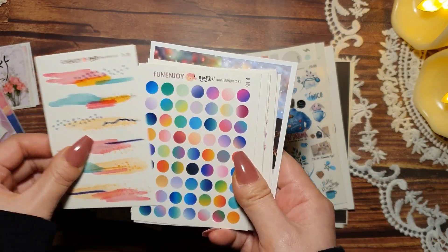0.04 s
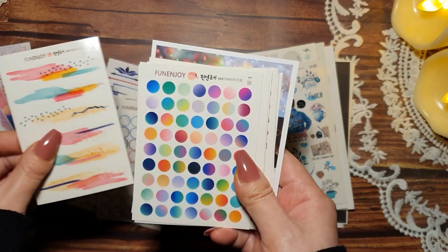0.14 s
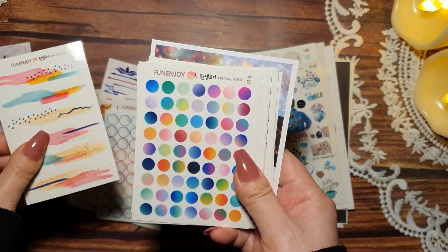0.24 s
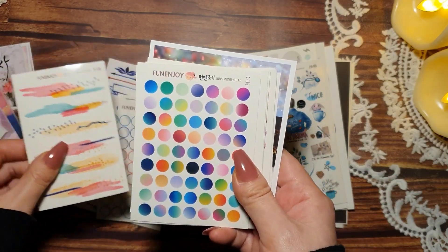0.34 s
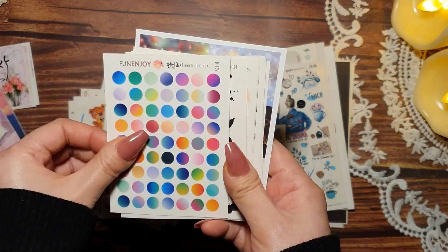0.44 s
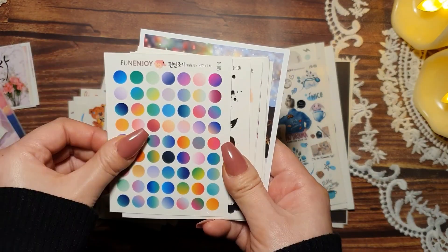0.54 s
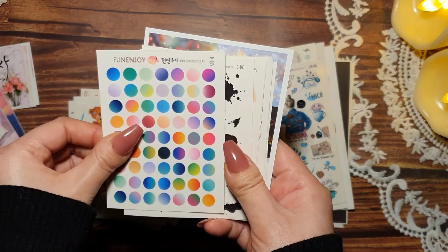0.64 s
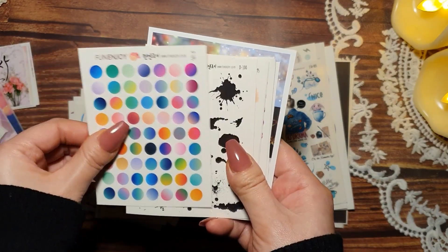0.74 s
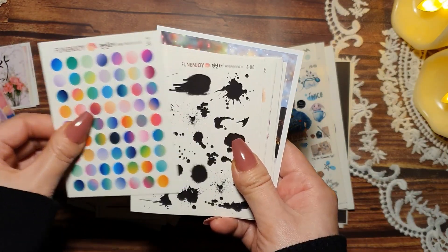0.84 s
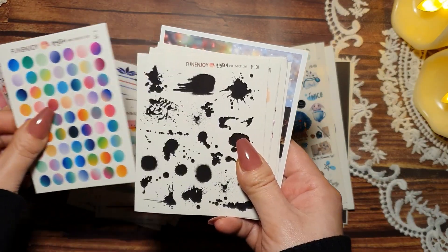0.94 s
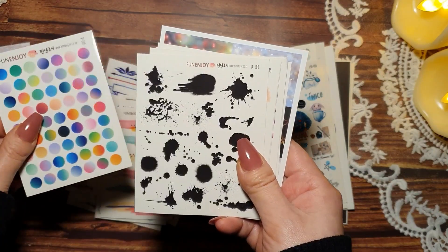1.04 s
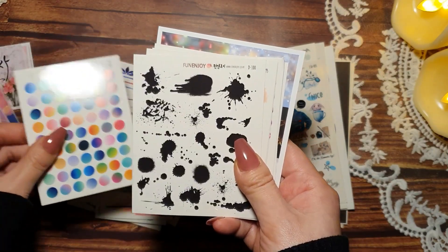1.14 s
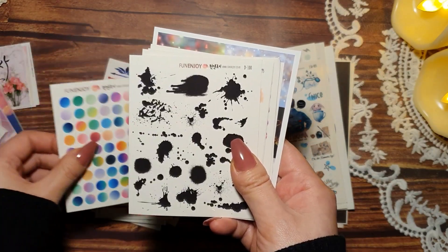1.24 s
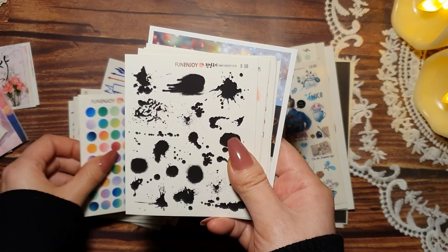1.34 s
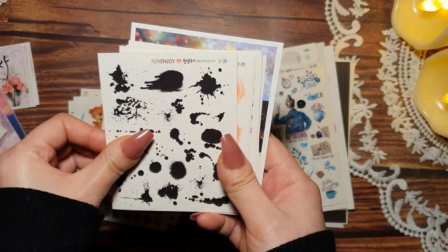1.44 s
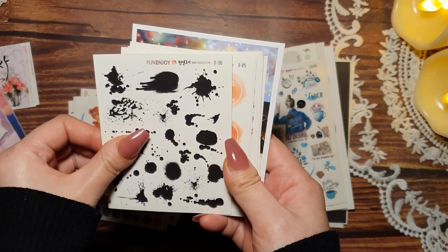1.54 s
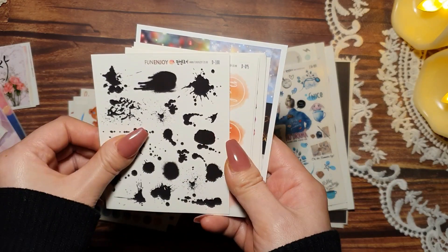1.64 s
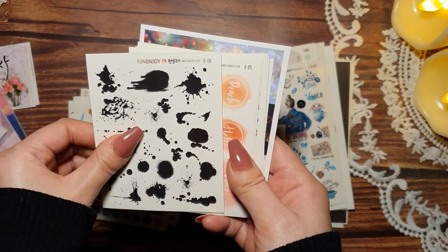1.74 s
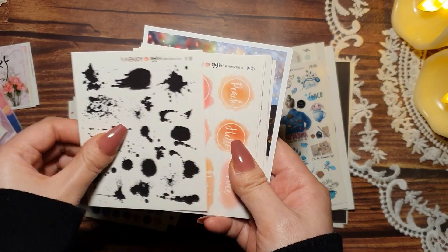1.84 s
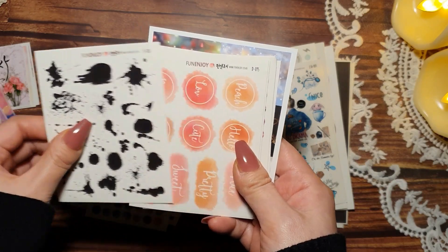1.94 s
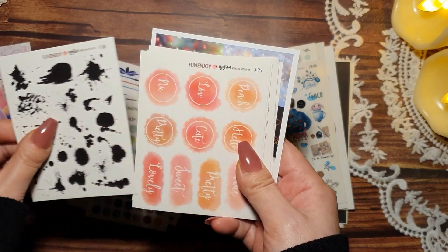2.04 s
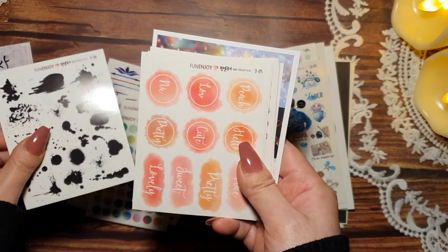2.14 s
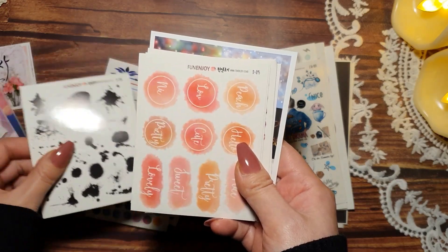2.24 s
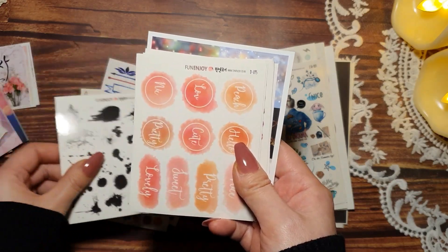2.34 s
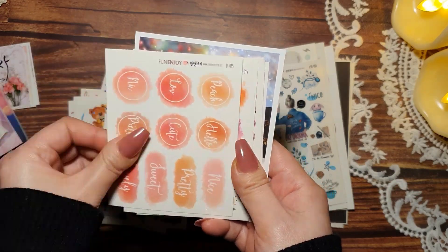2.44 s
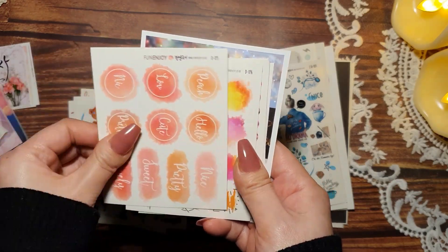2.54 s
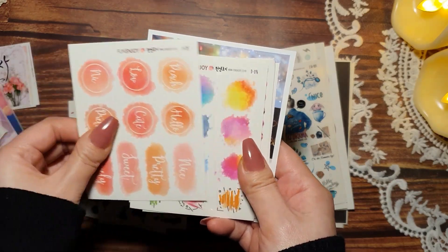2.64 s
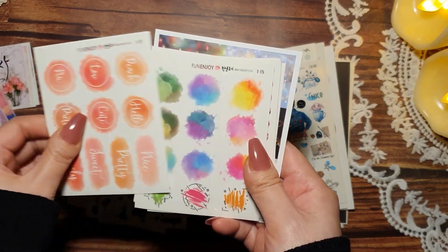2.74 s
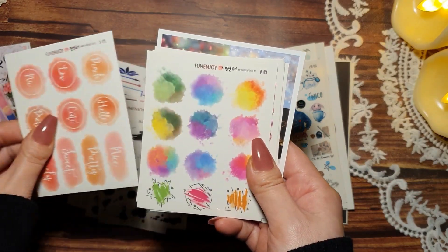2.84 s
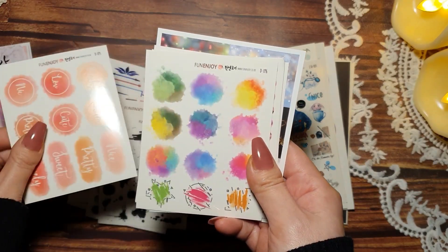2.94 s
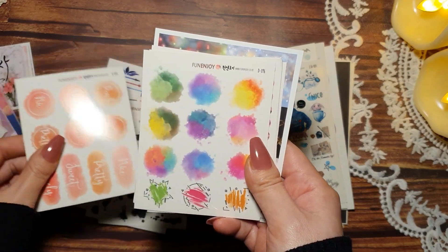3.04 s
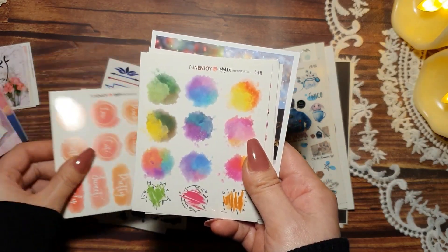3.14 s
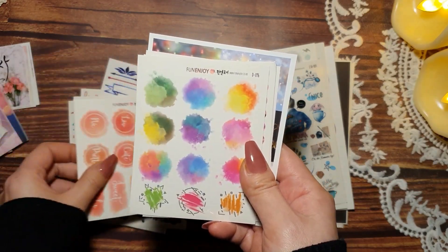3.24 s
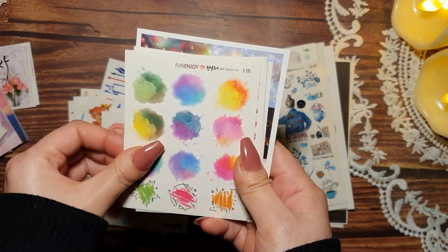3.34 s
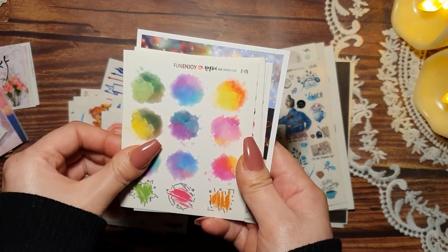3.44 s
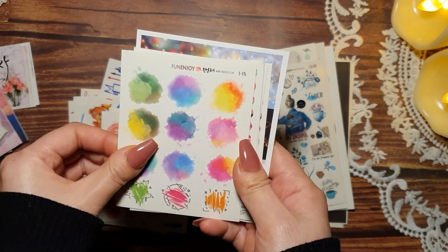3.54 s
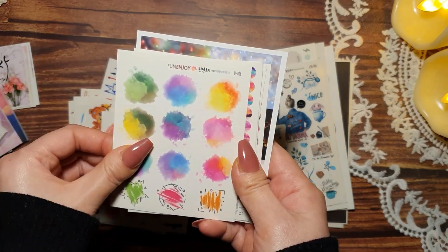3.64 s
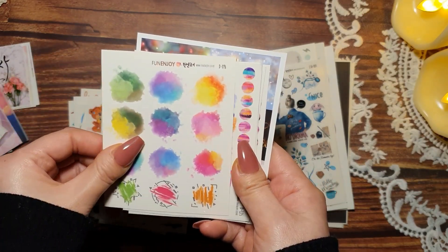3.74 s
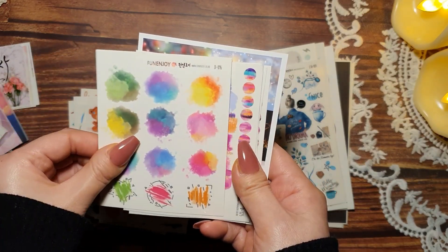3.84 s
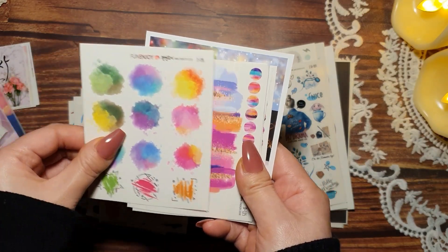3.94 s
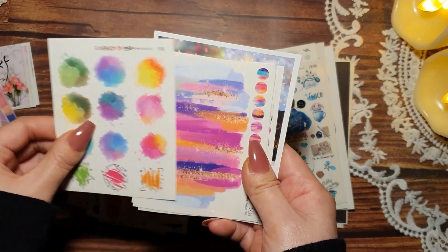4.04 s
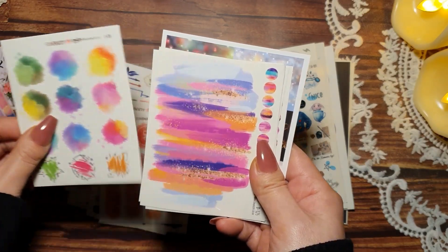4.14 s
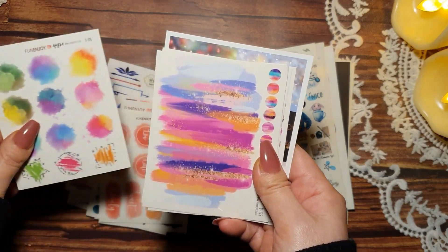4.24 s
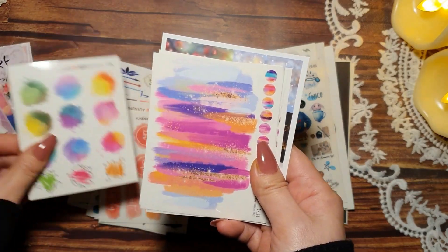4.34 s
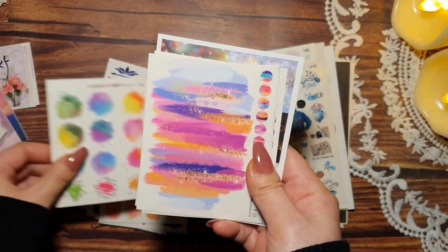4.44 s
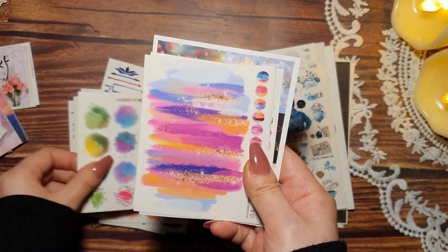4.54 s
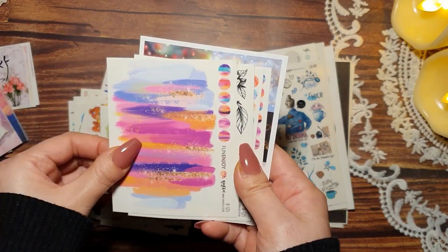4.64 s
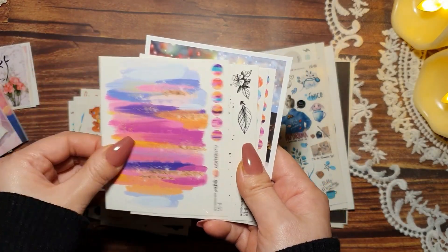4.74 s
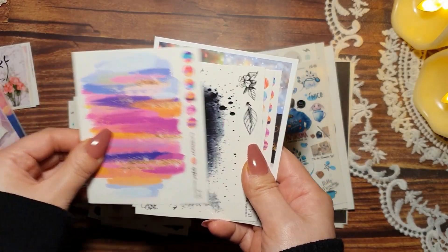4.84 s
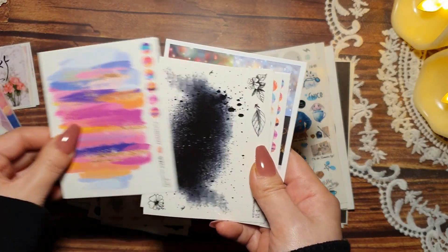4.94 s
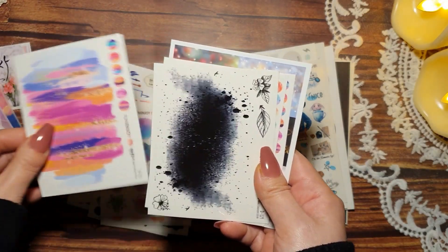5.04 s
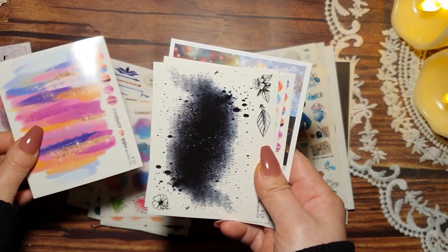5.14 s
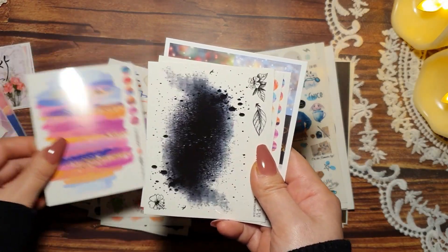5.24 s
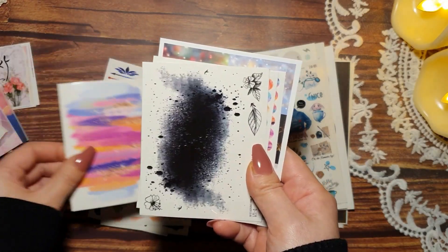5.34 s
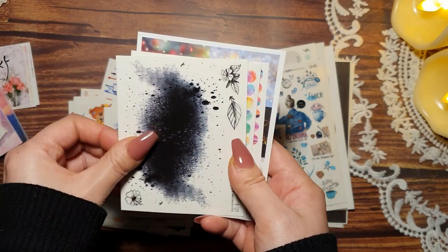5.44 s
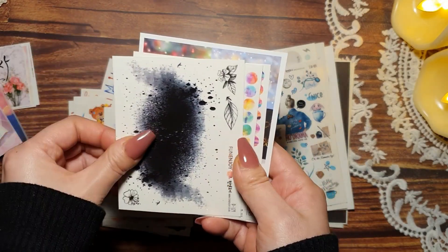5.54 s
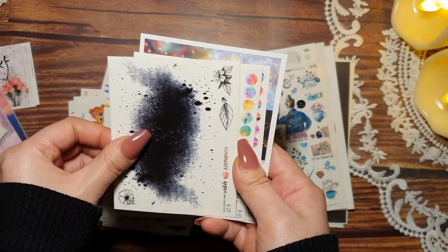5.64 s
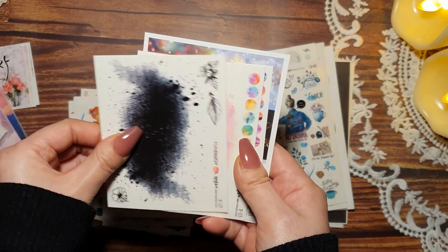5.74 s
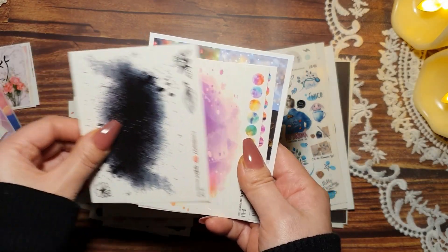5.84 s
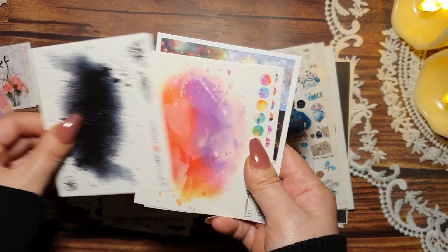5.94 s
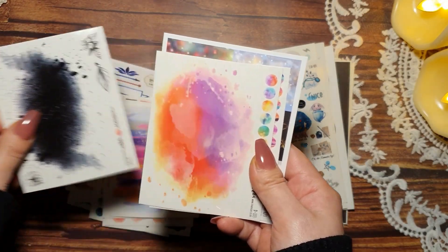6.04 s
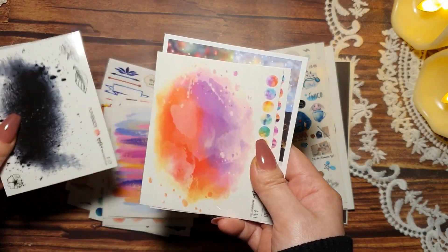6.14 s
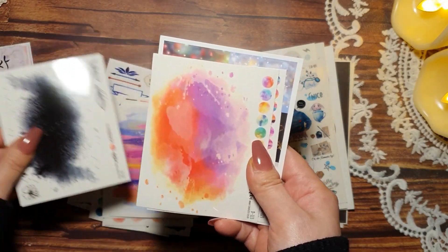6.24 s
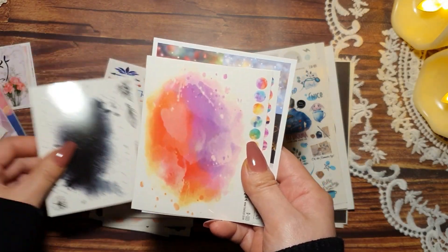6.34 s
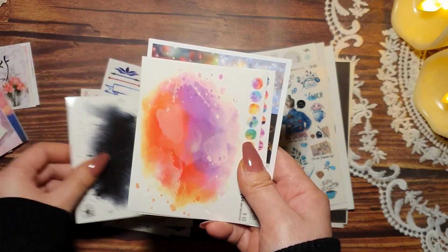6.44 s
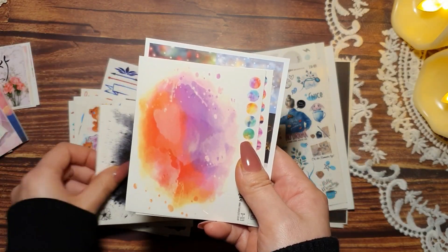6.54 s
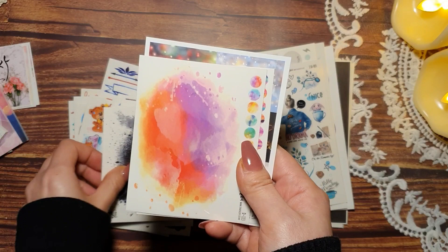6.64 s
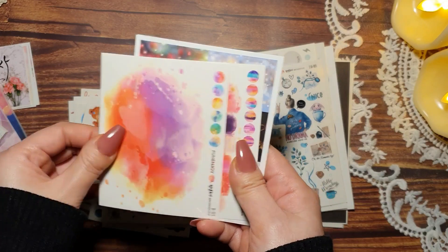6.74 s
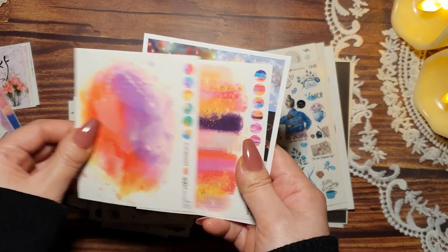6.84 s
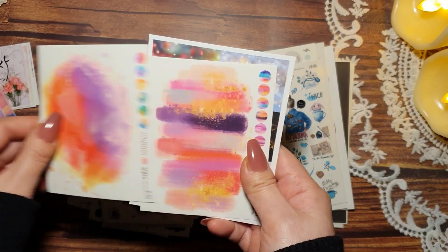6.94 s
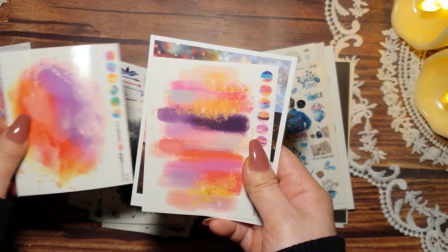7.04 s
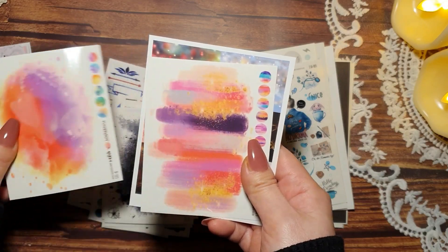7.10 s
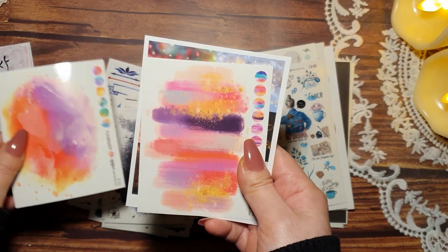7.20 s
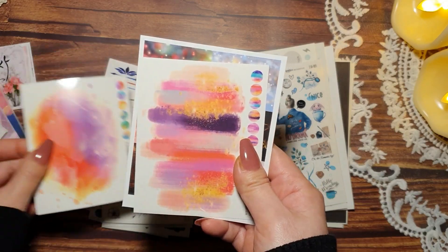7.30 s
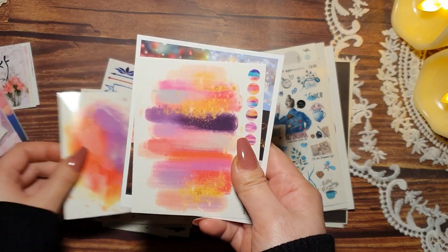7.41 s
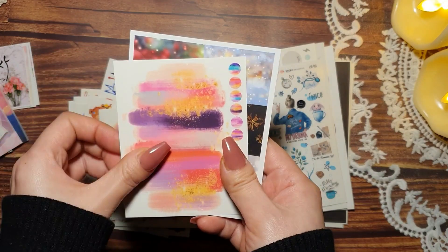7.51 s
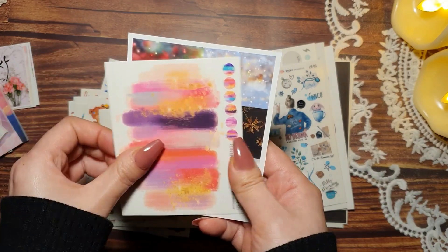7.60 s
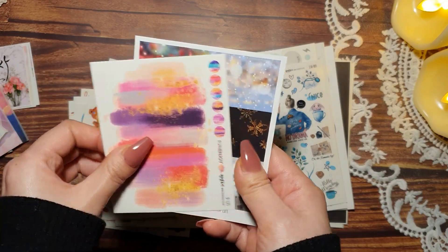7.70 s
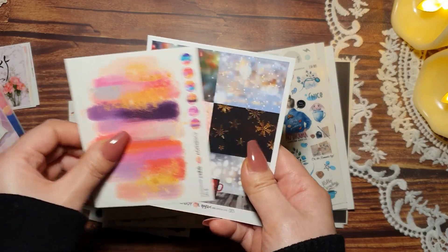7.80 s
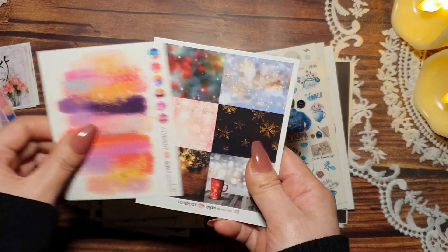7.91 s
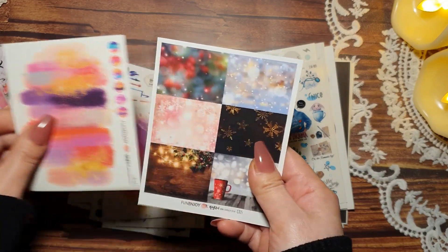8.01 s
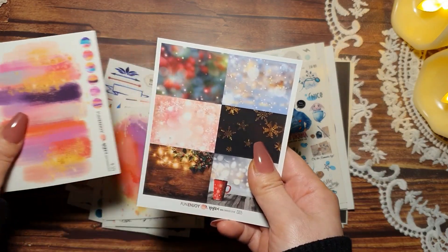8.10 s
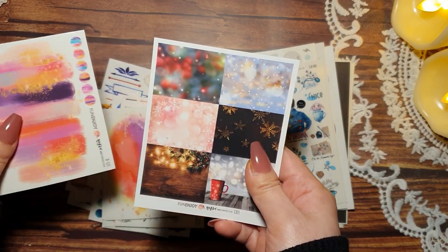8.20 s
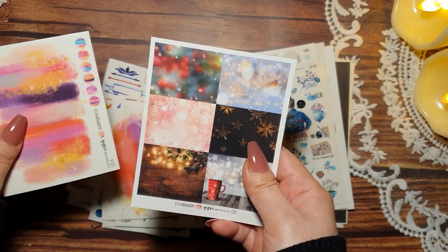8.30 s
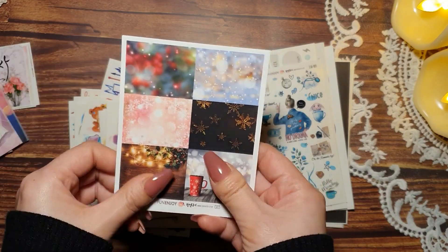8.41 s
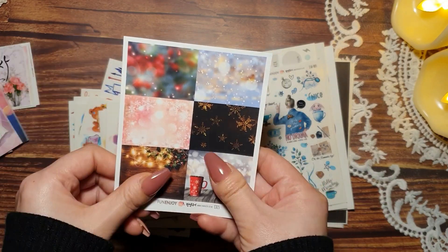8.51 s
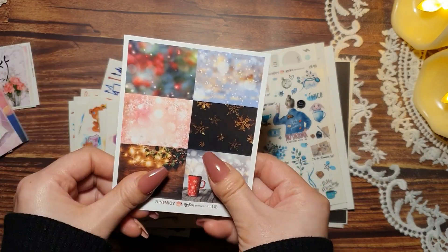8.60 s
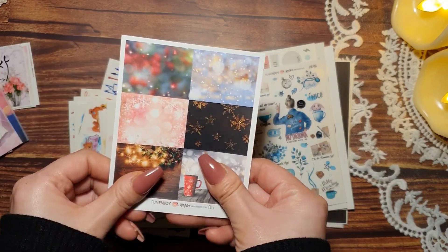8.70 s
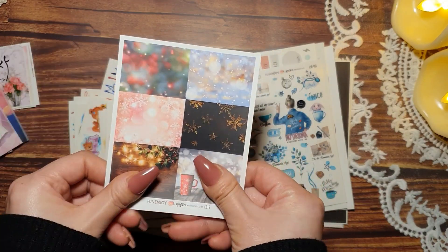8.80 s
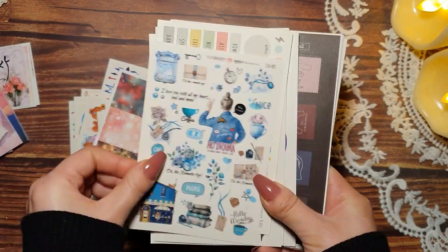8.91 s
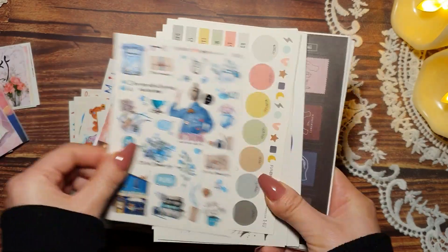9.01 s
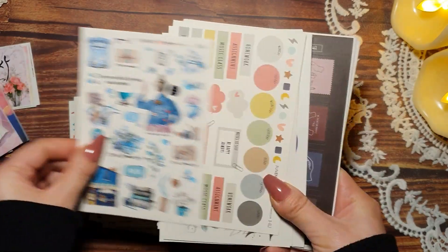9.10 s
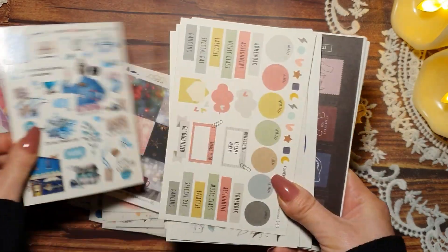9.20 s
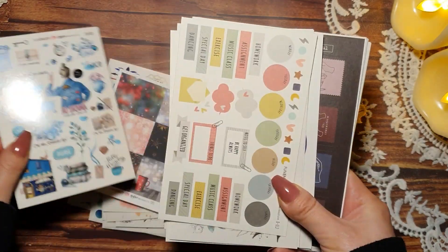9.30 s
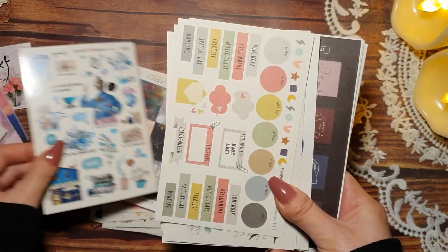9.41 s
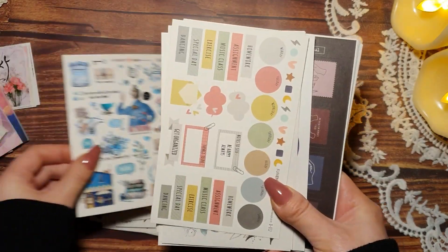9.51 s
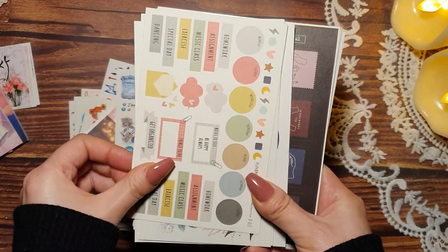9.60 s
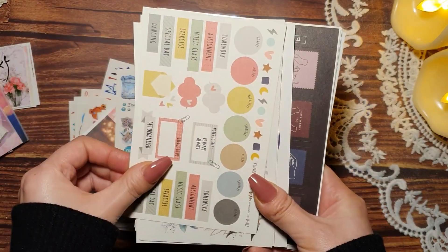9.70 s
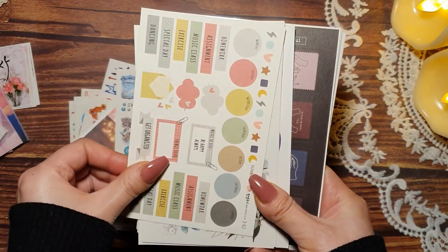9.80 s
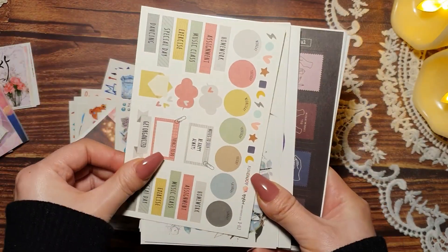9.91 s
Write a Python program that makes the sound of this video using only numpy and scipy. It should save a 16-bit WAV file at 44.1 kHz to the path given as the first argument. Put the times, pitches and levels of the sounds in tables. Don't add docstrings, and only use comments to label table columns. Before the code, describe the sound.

Hands flick through small sticker sheets about once a second: a short swish, a sharp edge click, a papery flop, soft finger rustles between.

```python
import sys
import numpy as np
from scipy import signal
from scipy.fft import rfft, irfft, next_fast_len
from scipy.io import wavfile
from scipy.ndimage import uniform_filter1d

SR = 44100
rng = np.random.default_rng(int(sys.argv[2]) if len(sys.argv) > 2 else 0)


def boost(x):
    u = np.asarray(x, float) / 20
    return 10 ** u


def transcribe(u):
    v = np.clip(np.atleast_2d(u).T, -1, 1)
    q = np.round(v * 32767).astype(np.int16)
    wavfile.write(sys.argv[1], SR, q)


N = 439225
T = np.arange(N) / SR
T_COARSE = T[::32]

# [f/Hz, width/Hz, level/dB]
SHEET_MODES = [(1822, 88, 8), (2350, 1240, 11.5), (3000, 890, 3.5), (3576, 1300, 9.5), (1127, 360, 2)]
# [f/Hz, width/Hz, level/dB]
STACK_MODES = [(390, 96, 10.5), (542, 190, 0), (880, 380, 14.5)]
# [f/Hz, level/dB per Hz]
FINE_SPECTRUM = [(2060, -24), (3500, 1.5), (3690, -12), (3960, -6), (4800, -4.5), (7040, 6.5), (8060, 0.5),
                 (10000, -4), (13000, -78), (22000, -120)]
# [f/Hz, level/dB per Hz]
GLOSS_SPECTRUM = [(4710, -16), (8000, -8), (10300, -3), (12200, -5.5), (15100, -11.5), (15900, -13)]
# [t/s, f/Hz]
OVERHANG = [(0, 2300), (1.09, 2080), (1.88, 1824), (2.13, 2640), (2.27, 2060), (3.08, 2260), (4.2, 1930),
            (4.35, 2220), (6.1, 2558), (6.7, 2030), (7.0, 2370), (7.73, 2030), (8.22, 2350), (8.7, 1980),
            (8.85, 2250), (8.97, 3200), (9.05, 2900), (9.3, 2750)]


def slides():
    fine_db, gloss_db, ring_db = friction()
    low_db, hollow_hz = hollow()
    overhang_hz = np.interp(T, *np.transpose(OVERHANG))
    flutter = wander(0.0093)
    drive, push = pair(0.89), pair(0.84)

    fine = coloured(pair(0.61), FINE_SPECTRUM) * boost(fine_db + 1.1 * flutter + 1.1 * wander(0.0018))
    gloss_level_db = fine_db + gloss_db + 0.74 * flutter + 1.5 * wander(0.013)
    gloss = coloured(pair(0.14), GLOSS_SPECTRUM) * boost(gloss_level_db)
    sizzle = signal.sosfilt(signal.butter(4, 11500, "high", fs=SR, output="sos"), gloss)
    gloss = gloss + sizzle * boost(3.2 * np.clip(gloss_db, -12, 9) - 9.5)

    corner = ringing(drive, SHEET_MODES[:1]) * boost(-7 - (overhang_hz - 2200) / 90)
    middle = ringing(drive, SHEET_MODES[1:2]) * boost(-1.5 - np.maximum(overhang_hz - 2350, 0) / 70)
    upper = 0.8 * ringing(drive, SHEET_MODES[2:])
    overhang = 0.66 * resonate(drive, overhang_hz, 1100)
    ring = evened(middle + upper + overhang + corner)
    low = evened(0.81 * ringing(push, STACK_MODES) + resonate(push, hollow_hz, 133))

    bright = placed(fine, 1.5, 4e-5) + placed(gloss, -2.3, 1e-5)
    body = ring * boost(ring_db + 1.1 * flutter + 0.24 * wander(0.0054))
    body = body + low * boost(low_db + 3.6 * wander(0.023))
    return patchy(bright + placed(body, 0.15, 7e-5), 1.3)


# [fastest t/s, swell/dB per s, fine level/dB, gloss re fine/dB, ring re fine/dB]
PULLS = [(0.242, 142, -52, -1, 2), (1.062, 309, -47, 4, -3), (2.17, 170, -48, 5, 1),
         (2.972, 121, -55.5, 0.5, 4), (4.233, 165, -46.5, 4.5, 0), (5.044, 139, -46, -9, -10.5),
         (5.16, 101, -61.5, -7, 11.5), (6.11, 121, -53, -2, -4.5), (7.072, 95, -37, 3, -7),
         (7.122, 1100, -48, -0.5, 5), (8.085, 115.5, -46, 6.5, 0), (8.9, 70, -63, 0, 3),
         (9.145, 205, -47.5, -10, 4), (9.254, 120, -30.5, -2.5, -3)]
# [t/s, length/s, fine level/dB, gloss re fine/dB, ring re fine/dB]
DRAGS = [(-.05, 0.18, -64.5, -5, -2.5), (0.496, .04, -68, -3, -7), (0.753, 0.17, -61.5, -6.5, -4.5),
         (1.566, .11, -62.5, -10.5, -4.5), (1.76, 0.12, -62.5, -14, -5), (1.93, 0.12, -63, -10, -8),
         (2.66, .34, -60, -7, -9.5), (3.782, 0.11, -64, -3, -11.5), (3.957, 0.222, -63, -15, -5.5),
         (4.89, .26, -59.5, -4.5, -2.5), (5.622, 0.28, -75.5, -4, 1), (5.81, 0.36, -61, -4, -15),
         (6.783, 0.27, -56, -14, -1.5), (7.722, .4, -54, -1.5, 3.5), (8.56, .11, -66, -8, -6),
         (8.69, .275, -55.5, -7, 4), (9.0, 0.28, -63.5, -20, 6), (9.57, 0.049, -79, -19, 3)]


def friction():
    ease_db_per_s, stop_db_per_s, longest_ease_s = (-150, -260, 41), -1050, 0.075
    hard_pull_db, ring_loss_per_s = -47.5, 9.3
    tapped_attack_db_per_s, soft_attack_db_per_s = 452, 130
    growth_db_per_s, release_db_per_s = (10, 21, 5.5), -220
    t, power = T_COARSE, 1e-12
    for s, swell, db, gloss_db, ring_db in PULLS:
        ease_s = min([row[0] - s for row in SLIPS if row[0] > s] + [longest_ease_s])
        shape = swell * np.minimum(t - s, 0) + stop_db_per_s * np.maximum(t - s - ease_s, 0)
        ease = np.subtract(ease_db_per_s, [0, 0, ring_loss_per_s * (db - hard_pull_db)])
        shape = shape + np.outer(ease, np.clip(t - s, 0, ease_s))
        power = power + boost(shape + db + np.array([[0], [gloss_db], [ring_db]])) ** 2
    for s, length, db, gloss_db, ring_db in DRAGS:
        tapped = min(abs(row[0] - s) for row in TAPS) < .015
        attack = tapped_attack_db_per_s if tapped else soft_attack_db_per_s
        shape = attack * np.minimum(t - s - .025, 0) + release_db_per_s * np.maximum(t - s - length, 0)
        shape = shape + np.outer(growth_db_per_s, np.clip(t - s - length / 2, -length / 2, length / 2))
        power = power + boost(shape + db + np.array([[0], [gloss_db], [ring_db]])) ** 2
    fine_db, gloss_db, ring_db = (np.interp(T, t, 10 * np.log10(p)) for p in power)
    return fine_db, gloss_db - fine_db, ring_db


# [middle t/s, half length/s, level/dB, hollow f/Hz]
RUBS = [(0.246, .03, -66, 795), (0.521, 0.019, -71, 455), (.8, 0.042, -65, 800), (1.025, 0.068, -72, 373),
        (1.61, .035, -63, 392), (1.854, 0.087, -68.5, 370), (2.212, 0.041, -57.5, 850),
        (2.608, .1, -72, 447), (2.97, .03, -64, 861), (3.844, 0.05, -75, 450), (4.033, 0.0425, -64.5, 451),
        (4.249, 0.074, -64.5, 880), (4.939, .05, -70.5, 913), (5.147, 0.034, -63, 850),
        (5.379, .05, -58.5, 422), (5.834, 0.057, -67, 417), (6.109, 0.046, -68.5, 421),
        (6.85, .12, -66, 380), (7.145, 0.04, -58, 760), (7.737, 0.017, -57.5, 366),
        (7.877, 0.11, -69.5, 800), (8.106, 0.062, -49.5, 880), (8.234, 0.12, -63, 390),
        (8.549, 0.032, -62, 850), (8.733, 0.096, -64, 830), (8.95, 0.049, -65, 699),
        (9.07, 0.066, -62, 406), (9.165, 0.035, -57, 834), (9.271, 0.061, -48.5, 950),
        (9.651, 0.0312, -72, 707)]


def hollow():
    edge_db, settle_db, settle_db_per_s, settle_hz = -8, -24, -260, 444
    t = T_COARSE
    parts = [(boost(-79.5) ** 2, settle_hz)]
    for s, half_s, db, hz in RUBS:
        parts.append((boost(db + edge_db * ((t - s) / half_s) ** 2) ** 2, hz))
    for s, db, _ in FLAPS:
        settling = boost(db + settle_db + settle_db_per_s * abs(t - s)) ** 2
        parts.append(((t > s) * settling, settle_hz))
    power = sum(p for p, _ in parts)
    hz = sum(p * f for p, f in parts) / power
    return np.interp(T, t, 10 * np.log10(power)), np.interp(T, t, hz)


# [t/s, peak level/dB, ring f/Hz, brightness/dB]
SLIPS = [(0.2714, -12, 2300, -23), (0.2885, -28, 2300, -22), (1.1081, -20, 1810, -17),
         (1.1327, -23.5, 2570, -19), (2.2178, -15, 1810, -22), (2.2378, -22, 2600, -24),
         (3.0204, -20, 2490, -20), (3.0412, -23, 2700, -25), (4.2955, -35.5, 2350, -1),
         (4.2976, -12, 2440, -24), (5.194, -23.5, 2340, -21.5), (5.2194, -27, 2080, -19.5),
         (6.1706, -34, 2440, -13), (6.1998, -39.5, 2310, -30.5), (7.081, -48.5, 2300, -6),
         (7.1632, -36, 2100, -16), (7.1836, -24.5, 2620, -19), (8.165, -39, 1780, -18),
         (9.3243, -22.5, 2920, -20), (9.3617, -32, 1250, -21.5)]
# [t/s, peak level/dB, ring f/Hz, brightness/dB]
TAPS = [(1.4367, -50, 990, -5), (1.5835, -48, 1430, -4), (3.3865, -39, 2200, -26),
        (4.6997, -49, 1820, -8.5), (6.6967, -41, 1410, -16), (6.7591, -38.5, 2370, -18),
        (6.786, -42.5, 1770, 2), (7.5882, -54.5, 1570, -4), (7.622, -47, 1700, -10),
        (7.7192, -43, 1710, -8), (8.2895, -38, 2600, -14), (8.5098, -46, 1940, -12.5),
        (8.6438, -52, 1050, -4), (8.681, -42.5, 2140, -20), (8.7055, -41.5, 1960, -20),
        (9.5905, -46.5, 2100, -9), (9.6596, -55, 1440, -5)]


def ticks():
    slip_t60_s, tap_t60_s, dull_s_per_db = 0.017, .011, .0007
    rings, cracks, t = np.zeros(N), np.zeros((2, N)), np.arange(2000) / SR
    rows = [(*row, slip_t60_s) for row in SLIPS]
    rows += [(*row, tap_t60_s - dull_s_per_db * row[3]) for row in TAPS]
    for s, db, hz, bright_db, t60_s in rows:
        ring = np.sin(2 * np.pi * hz * t) * boost(-60 * t / t60_s)
        for (mode_hz, _, mode_db), phase in zip(SHEET_MODES, rng.random(len(SHEET_MODES))):
            near_db = mode_db - 15.5 - 4.5 * abs(np.log2(mode_hz / hz))
            fade = boost(near_db - 60 * t / (0.66 * t60_s))
            ring = ring + fade * np.sin(2 * np.pi * (mode_hz * t + phase))
        band = signal.butter(2, [hz * 0.42, hz * 1.51], "band", fs=SR)
        rattle = evened(signal.lfilter(*band, rng.standard_normal(len(t))))
        ring = ring + rattle * boost(-9 - 60 * t / (2.0 * t60_s))
        add(rings, s, boost(db - 3.5) * ring * np.minimum(t / 0.00052, 1))

        a, b, c = signal.lfilter([1, -1], [1, -1.1, .45], rng.standard_normal((3, len(t))))
        fade = boost(db + bright_db + 1 - 60 * t / 0.027) * np.minimum(t / 0.000244, 1)
        add(cracks[0], s, (a + 0.72 * b) * fade)
        add(cracks[1], s, (a + .6 * c) * fade)
    return np.tile(rings, (2, 1)), cracks


# [t/s, peak level/dB, f/Hz]
FLAPS = [(0.272, -25.5, 808), (0.2768, -20, 760), (0.288, -26.5, 380), (1.1075, -32, 896),
         (1.112, -33, 960), (1.131, -39, 620), (1.143, -43, 400), (2.2175, -20, 930), (2.222, -22, 1136),
         (2.2305, -22, 560), (2.2345, -25, 850), (3.0205, -24, 850), (3.0282, -19, 560),
         (3.0372, -25.5, 700), (4.299, -28, 1030), (4.304, -29, 950), (4.306, -21, 465), (4.315, -26, 480),
         (5.195, -31, 447), (5.204, -30, 820), (5.218, -28, 810), (6.178, -30.5, 450), (6.1868, -30, 820),
         (7.162, -25, 668), (7.171, -33, 617), (7.182, -34, 470), (8.167, -28, 930), (9.325, -30, 983),
         (9.361, -36, 993)]
# [t/s, peak level/dB, f/Hz]
CREASES = [(1.439, -51, 522), (1.554, -48, 320), (1.586, -44.5, 410), (2.033, -46.5, 830),
           (4.008, -40.5, 595), (5.662, -52, 460), (6.697, -52.5, 704), (7.72, -47, 384), (8.287, -46, 466),
           (8.507, -45.5, 750), (8.532, -48, 933), (8.679, -43, 880), (8.703, -41, 880)]


def flaps():
    landing_db, landing_s = -9, .004
    out, t = np.zeros(N), np.arange(5000) / SR
    for s, db, hz in [*FLAPS, *CREASES]:
        phase_a, phase_b = rng.random(2)
        turns = hz * (0.775 * t + 0.349 * 0.01198 * (1 - np.exp(-t / 0.013)))
        wave = np.sin(2 * np.pi * turns)
        wave += 0.33 * np.sin(2 * np.pi * (1.45 * turns + phase_a))
        wave += 0.47 * np.sin(2 * np.pi * (0.626 * turns + phase_b))
        t60_s = 0.033 + 2.9 / hz
        land_s = min([row[0] - s for row in SLIPS if .002 < row[0] - s < .026] + [1])
        wave *= boost(landing_db * np.clip((t - land_s) / landing_s, 0, 1))
        add(out, s, boost(db + 0.5 - 60 * t / t60_s) * wave * np.minimum(t * hz / 0.9, 1))
    return out


# [t/s, peak level/dB, f/Hz]
PUFFS = [(0.27, -35.5, 320), (1.112, -32, 104), (2.22, -35, 304), (3.0205, -37, 191), (4.005, -39, 98),
         (4.005, -45, 260), (4.31, -35.5, 93), (5.201, -40, 101), (6.174, -38.5, 192), (8.165, -35, 310),
         (8.198, -42, 95), (9.341, -43, 91.5), (9.345, -41, 244)]


def puffs():
    out, t = np.zeros(N), np.arange(5000) / SR
    for s, db, hz in PUFFS:
        fade = boost(db + 2.5 - 60 * t / 0.063) * np.minimum(t / 0.00058, 1)
        add(out, s, fade * np.sin(2 * np.pi * hz * t))
    return out


# [t/s, peak level/dB, f/Hz]
OVERTONES = [(0.2716, -26, 3600), (1.1083, -27, 2590), (1.1085, -31, 3360), (2.2182, -20, 2630),
             (2.2195, -28, 3500), (3.0205, -30, 1960), (3.0208, -29, 3650), (4.2972, -22, 1735),
             (4.2974, -19, 3300), (4.307, -33, 2400), (5.0595, -47, 3400), (5.0595, -49, 2200),
             (5.2196, -36, 3500), (7.1838, -34, 1900), (8.549, -56, 2200), (3.3867, -44, 1500),
             (3.3867, -47, 1100), (6.171, -40, 900), (6.697, -47, 2200), (6.697, -48, 950),
             (8.29, -46, 5000), (8.29, -44, 6400)]
# [middle t/s, half length/s, level/dB, f/Hz]
SQUEAKS = [(0.258, .007, -42, 2300), (1.079, .005, -44, 1900), (1.648, .012, -57, 1800),
           (4.213, .009, -41, 1760), (4.286, .006, -42, 1800), (7.155, .007, -35, 800),
           (5.175, .008, -46, 2600)]


def squeaks():
    out, t = np.zeros(N), np.arange(2000) / SR
    for s, db, hz in OVERTONES:
        fade = boost(db - 60 * t / .02) * np.minimum(t / .0006, 1)
        add(out, s, fade * np.sin(2 * np.pi * hz * t))
    u = t - t.mean()
    for s, half_s, db, hz in SQUEAKS:
        swell = boost(db - 9 * (u / half_s) ** 2)
        add(out, s + u[0], swell * np.sin(2 * np.pi * hz * (u + 1.2 * u ** 2)))
    return out


# [f/Hz, t60/s]
ROOM_T60 = [(200, 0.1295), (800, 0.19), (2500, 0.092), (8000, 0.16)]


def room(x):
    taps = np.zeros((2, 16000))
    at = np.arange(60, 15900, 20) + rng.integers(0, 20, (2, 792))
    np.put_along_axis(taps, at, rng.choice([-1., 1.], at.shape), 1)
    hz, t, z = signal.stft(taps, SR, nperseg=256)
    tail = signal.istft(z * boost(-60 * t / read(ROOM_T60, hz)[:, None]), SR, nperseg=256)[1]
    tail = 0.17 * tail + 1.0 * tail[::-1] * [[.5], [1.2]]
    length = tail.shape[1]
    z = rfft(tail)
    target = read(ROOM_T60, np.fft.rfftfreq(length, 1 / SR))
    z = z * np.sqrt(target / uniform_filter1d(abs(z) ** 2, size=50))
    tail = irfft(z) * np.clip(np.linspace(8, -1, length), 0, 1)
    return signal.fftconvolve(x, tail / np.linalg.norm(tail[0]), axes=1)[:, :N]


# [f/Hz, level/dB per Hz]
RUMBLE_SPECTRUM = [(18, -27.5), (30, -17), (42, -2), (53, 4), (81, -6.5), (139, -11.5), (171, -17.5),
                   (270, -33), (320, -35.5), (420, -69), (700, -120)]
# [t/s, level/dB]
RUMBLE_LEVEL = [(0.0, -57), (0.69, -51), (0.8, -61.5), (1.14, -47), (1.25, -59), (1.39, -45.5),
                (1.66, -59.5), (5.88, -53), (5.94, -48.5), (6.32, -58.5), (7.68, -51), (7.96, -59),
                (8.71, -45.5), (9.26, -58), (9.32, -44), (9.85, -57.5), (9.9, -45.5), (9.96, -61)]
# [f/Hz, level/dB per Hz]
HISS_SPECTRUM = [(120, -15), (200, 2), (273, -4.5), (634, -10), (1970, -14), (2840, -12.5), (5110, -20),
                 (6480, -10), (7240, -16.5), (8530, -14.5), (9350, -22.5), (14200, -22), (15900, -29.5)]


def background():
    a, b, c = rng.standard_normal((3, N))
    level_db = np.interp(T, *np.transpose(RUMBLE_LEVEL)) + 0.87 * wander(0.0338) + 1.23 * wander(0.135)
    rumble = coloured(a + [[.22], [.3]] * np.array([b, c]), RUMBLE_SPECTRUM) * boost(level_db)
    rumble = signal.sosfilt(signal.butter(4, 38, "high", fs=SR, output="sos"), rumble)
    hiss = coloured(rng.standard_normal((2, N)), HISS_SPECTRUM) * boost(-64.5)
    return rumble * boost(np.array([[.8], [-.8]])) + hiss


def evened(x):
    return x / np.sqrt(np.mean(x ** 2) + 1e-20)


def read(points, hz):
    f, value = np.transpose(points)
    return np.interp(np.log(hz + 1), np.log(f + 1), value)


def coloured(x, spectrum):
    size = next_fast_len(N)
    hz = np.fft.rfftfreq(size, 1 / SR)
    inside = (hz > spectrum[0][0]) & (hz < spectrum[-1][0])
    return evened(irfft(rfft(x, size) * boost(read(spectrum, hz)) * inside, size)[..., :N])


def ringing(x, modes):
    out = 0
    for hz, width_hz, db in modes:
        b, a = signal.iirpeak(hz, hz / width_hz, SR)
        out = out + boost(db) * evened(signal.lfilter(b, a, signal.lfilter(b, a, x)))
    return evened(out)


def resonate(x, hz, width_hz):
    turn = np.exp(2j * np.pi * np.cumsum(hz) / SR)
    r = np.exp(-np.pi * width_hz / SR)
    smooth = signal.lfilter([1], np.convolve([1, -r], [1, -r]), x / turn)
    return evened((turn * smooth).real)


def wander(span_s):
    size = max(round(span_s * SR), 2)
    return evened(uniform_filter1d(uniform_filter1d(rng.standard_normal(N), size), size))


def pair(same):
    a, b, c = rng.standard_normal((3, N))
    grit = boost(2.0 * np.minimum(rng.exponential(1, N), 5))
    return grit * (np.sqrt(same) * a + np.sqrt(1 - same) * np.array([b, c]))


def patchy(x, depth_db):
    z = signal.stft(x, nperseg=256, noverlap=192)[2]
    patches = uniform_filter1d(rng.standard_normal(z.shape[1:]), 5, 0)
    patches = uniform_filter1d(patches, 24, 1)
    return signal.istft(z * boost(depth_db * evened(patches)), nperseg=256, noverlap=192)[1][:, :N]


def placed(x, pan_db, lag_s):
    size = next_fast_len(N)
    delay = np.exp(-2j * np.pi * np.fft.rfftfreq(size, 1 / SR) * lag_s)
    late = irfft(rfft(x[1], size) * delay, size)[:N]
    return np.array([x[0] * boost(pan_db / 2), late * boost(-pan_db / 2)])


def add(mix, s, sound):
    part = mix[round(s * SR):][:len(sound)]
    part += sound[:len(part)]


def scene():
    rings, cracks = ticks()
    hits = rings + flaps() + puffs() + squeaks()
    rubs = slides()
    near = placed(hits, 2.2, 9.5e-5) + placed(cracks, 1.64, 3e-5) + rubs
    near = near + room(boost(-11) * hits + boost(-14.0) * cracks + boost(-15) * rubs)
    near = near - 0.27 * signal.lfilter(*signal.iirpeak(1490, 4.5, SR), near)
    return near + background()


def band_limit(x):
    return signal.sosfilt(signal.butter(12, 15900, fs=SR, output="sos"), x)


# [middle t/s, half length/s]
DROPOUTS = [(.521, .002), (5.527, .005), (6.75, .003), (8.503, .003), (8.982, .007)]


def record(dry):
    for s, half_s in DROPOUTS:
        dry = dry * (1 - .88 * np.exp(-((T - s) / half_s) ** 4))
    mix = signal.sosfiltfilt(signal.butter(12, 16000, fs=SR, output="sos"), dry)
    return band_limit(mix)


dry = scene()
out = record(dry)
transcribe(out)
```